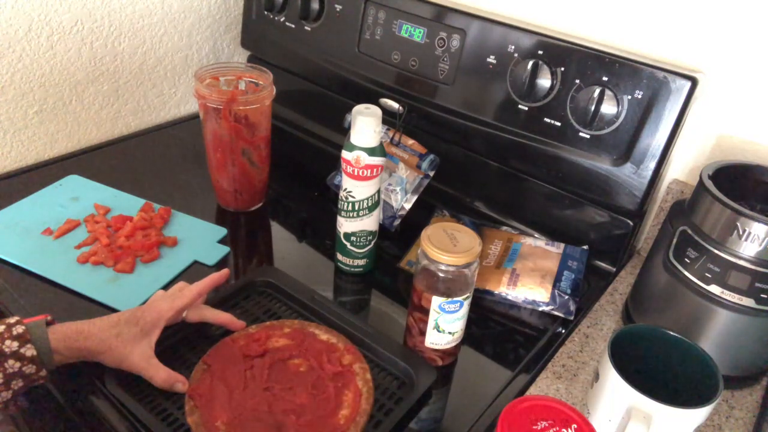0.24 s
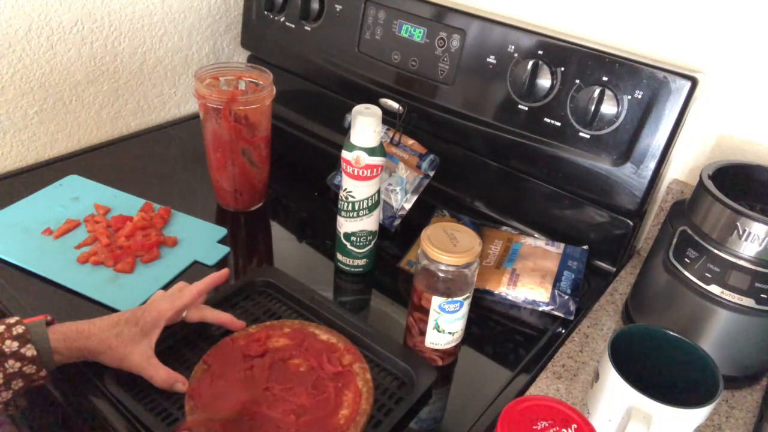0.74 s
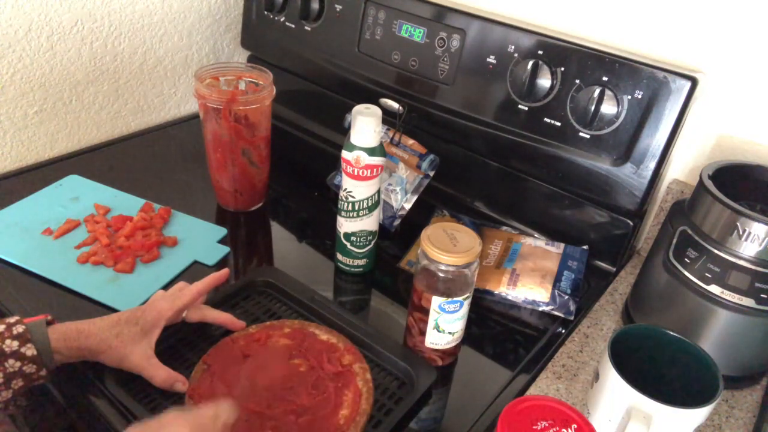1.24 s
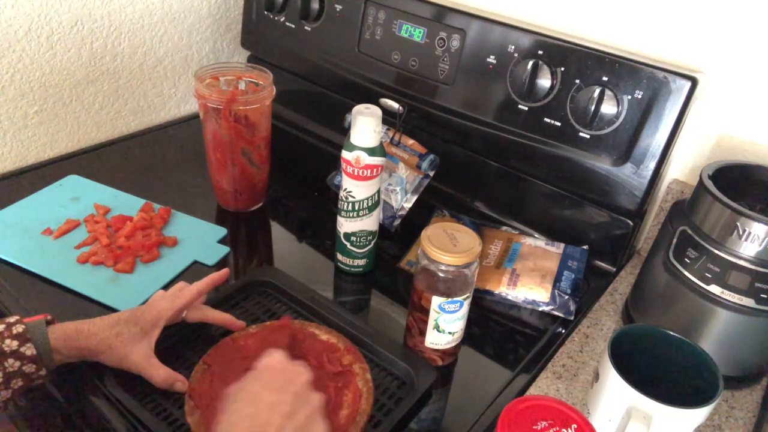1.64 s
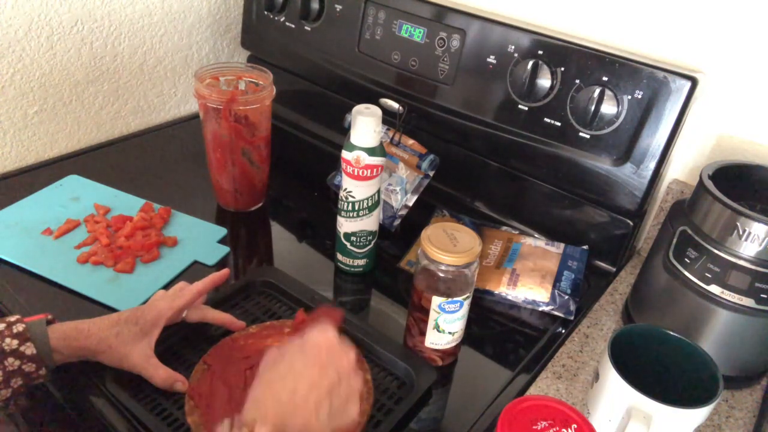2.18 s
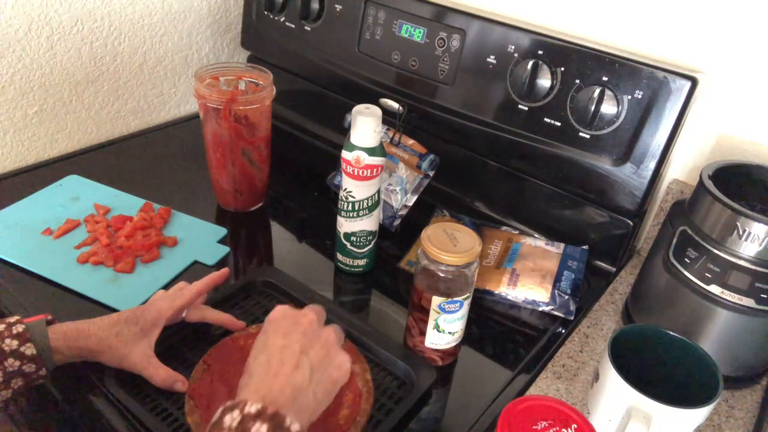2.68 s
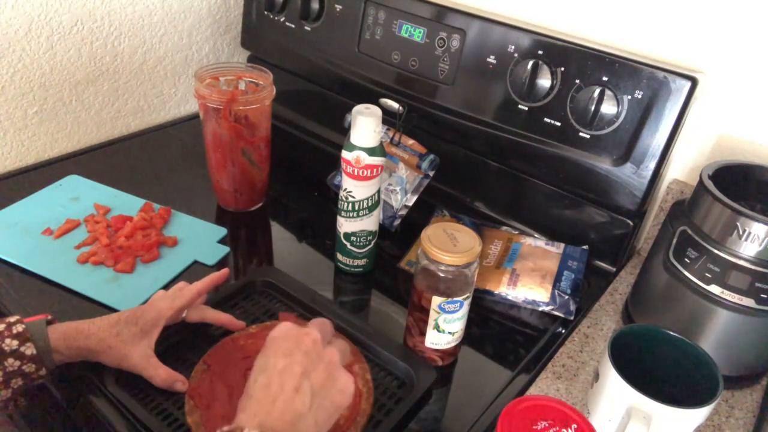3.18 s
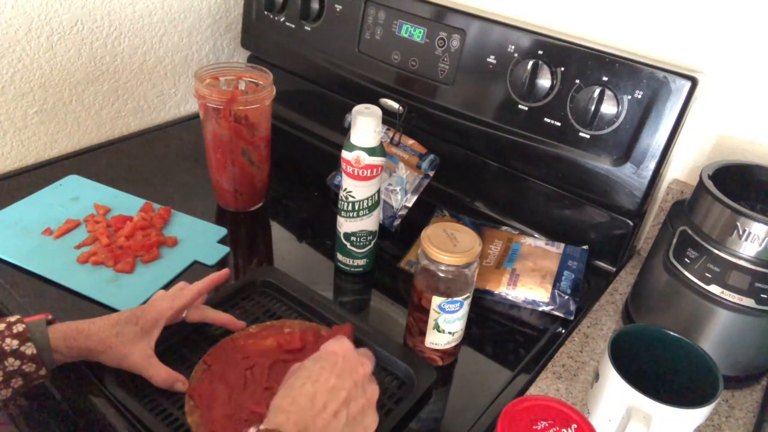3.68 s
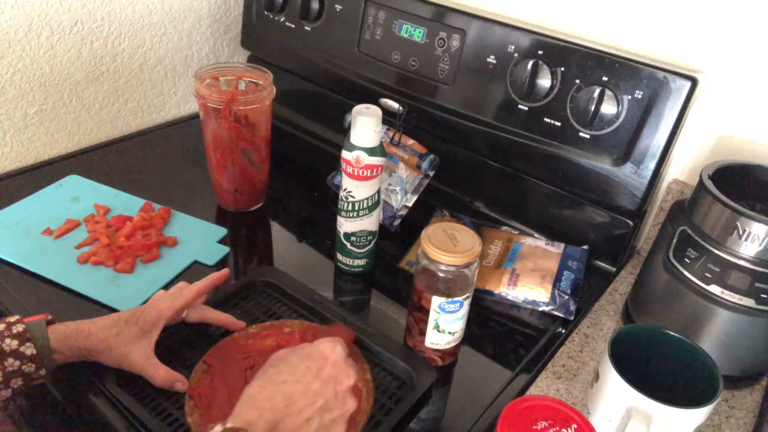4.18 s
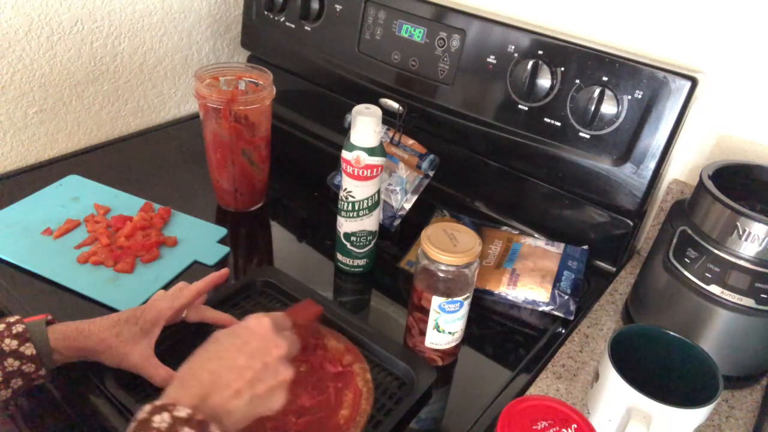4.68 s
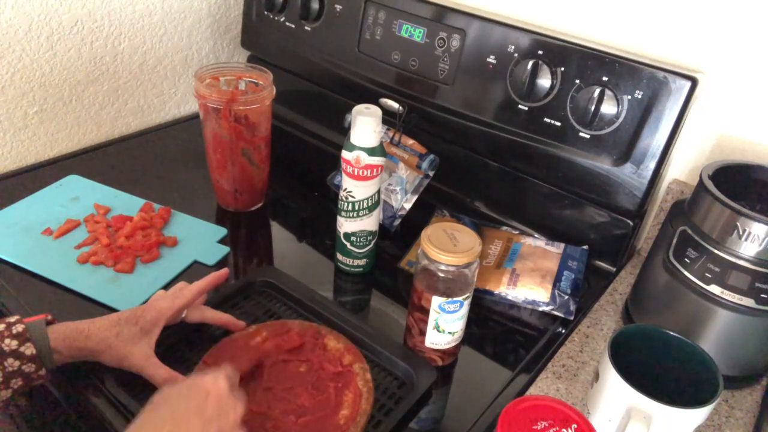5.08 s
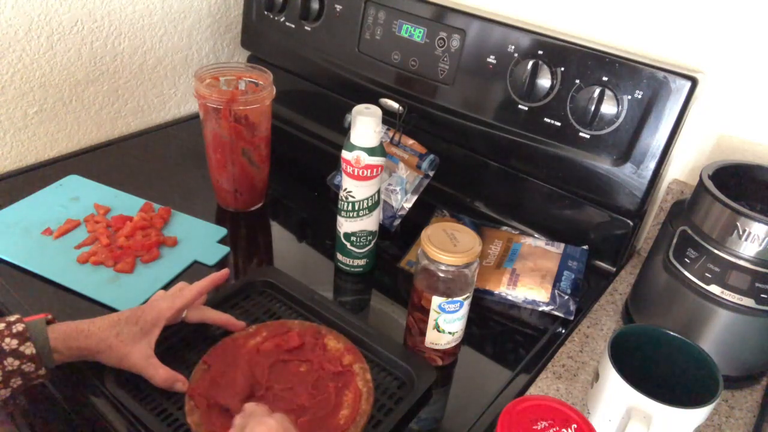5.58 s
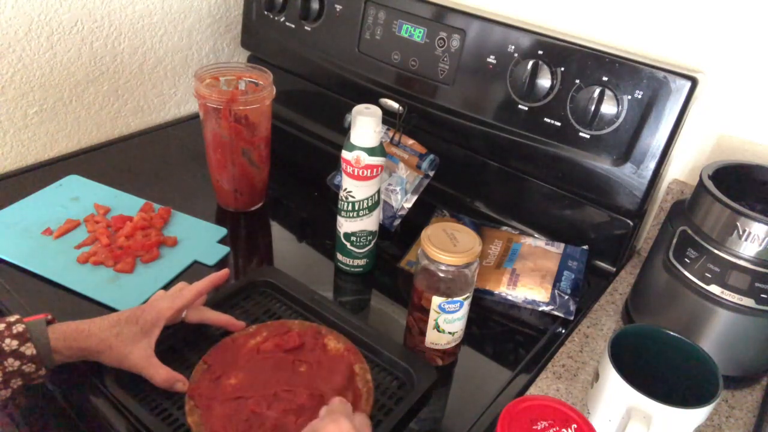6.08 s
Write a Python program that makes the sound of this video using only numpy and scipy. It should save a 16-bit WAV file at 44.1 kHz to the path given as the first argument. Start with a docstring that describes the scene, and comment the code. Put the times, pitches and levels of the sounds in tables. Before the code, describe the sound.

A utensil spreads tomato sauce on a pizza base, making quiet, scattered ticks and squelches close by. One sharp, briefly ringing click on the metal pan stands out as the loudest sound. After a small cluster of squelches come two cushioned clatters on the pan and a faint swell of crackle. A low, even hum of a fridge and fan fills the small kitchen throughout.

```python
"""Tomato sauce is spread over a pizza base on a metal pan on a stove top, in a small kitchen.
From the start, over the steady hum of a fridge compressor and a fan, the sauce film ticks as it parts
and bubbles squelch under the utensil. At 2.4 s a knock excites the pan's modes in one sharp click.
Near 4 s the squelches crowd together; at 4.2 s and 4.6 s cushioned knocks rebound in two soft clatters.
The hissy crackle swells briefly at 4.9 s, and a few last ticks and squelches follow."""
import sys
import numpy as np
from scipy import signal
from scipy.fft import rfft, irfft
from scipy.io import wavfile

SR = 44100
rng = np.random.default_rng(int(sys.argv[2]) if len(sys.argv) > 2 else 0)


def to_wav(s):
    """Save 16-bit WAV."""
    ch = np.atleast_2d(s).T  # columns
    pcm = np.round(np.clip(ch, -1, 1) * 32767)  # PCM
    wavfile.write(sys.argv[1], SR, pcm.astype(np.int16))


N = 279153
T = np.arange(N) / SR


# the sauce film parting: start_s, relative_level_db, centre_hz, width_octaves
FILM_TICKS = [(.213, -62.5, 13000, .7), (.337, -58, 6860, 0.41), (.573, -62, 8500, 1.1),
              (1.121, -65, 13000, .6), (1.887, -58.5, 14000, .8), (3.130, -61, 13650, 0.8),
              (4.186, -55.5, 9000, .6), (4.431, -57, 9600, 0.35), (4.548, -47, 12000, 1),
              (5.013, -60, 13500, .6), (5.049, -53, 13000, .7), (5.254, -64.5, 11000, 1.5)]
# sauce squeezed under the utensil: start_s, level_db, centre_hz, width_octaves, length_s
SQUEEZES = [(1.188, -58.5, 3500, 0.9, 0.011), (1.875, -60.5, 3550, 0.89, .009),
            (3.923, -59, 1250, 0.4, 0.015), (3.956, -57, 2210, 1.1, .0031), (4.005, -59, 1300, 1.3, 0.024),
            (4.03, -51, 1320, .87, 0.012), (4.543, -60, 1970, 3.1, 0.0094), (4.918, -66, 990, 1.7, 0.026),
            (5.549, -62, 3730, 1.2, .012)]

def sauce(tick_gain_db=-1, slide_db=-81, slide_band_hz=(3500, 7500), grains_per_s=2500, swell_db=8.5):
    """Rupture and friction: ticks, duller squelches and a hissy crackle that wavers and swells once."""
    out = np.zeros(N)
    for start_s, db, hz, octaves, length_s in SQUEEZES:
        add(out, start_s, from_db(db) * squelch(hz, octaves, length_s))
    grains = (rng.random(N) < grains_per_s / SR) * rng.standard_normal(N)
    grains *= from_db(2.5 * drift(40))  # the crackle comes in clumps
    contour_db = 0.9 * drift(4) + swell_db * bump(4.9, width_s=0.069)
    for start_s, db, hz, octaves in FILM_TICKS + faint_ticks():
        add(out, start_s, from_db(db + tick_gain_db) * film_tick(hz, octaves))
    crackle = rms_one(cut(grains, slide_band_hz, "band"))
    return out + from_db(slide_db + contour_db) * crackle


def squelch(hz, octaves, length_s, ring_cycles=10, rise=0.38, count=24, size=4000):
    """Bubble resonance: each of a cluster of tiny bubbles rings, rising in pitch as it dies."""
    place, pitch, strength = rng.random((3, count, 1))
    birth_s = length_s * (np.arange(count)[:, None] + place) / count
    age = np.maximum(T[:size] - birth_s, 0)
    bubble_hz = hz * 2 ** (octaves * (pitch - .5))
    t60 = ring_cycles / bubble_hz
    amplitude = (.5 + strength) * rng.choice([-1, 1], (count, 1))
    phase = 2 * np.pi * bubble_hz * age * (1 + rise * age / t60)
    cluster = (amplitude * np.sin(phase) * decay(age, t60)).sum(axis=0)
    return rms_one(cluster) * np.sqrt((length_s + 0.00092) * SR / size)  # rms near 1 while it lasts


def film_tick(hz, octaves, attack_s=0.00027, hold_s=0.00076, t60=0.042, size=6000):
    """Film rupture: tiny air pockets burst for a moment, and the sound scatters off the stove top."""
    t = T[:size]
    grains = rng.standard_normal(size) * from_db(1.2 * rng.standard_normal(size))
    edges_hz = hz * 2 ** (np.array([-.5, .5]) * octaves)
    band = rms_one(cut(grains, edges_hz, "band"))
    return band * (1 - np.exp(-t / attack_s)) * decay(np.maximum(t - hold_s, 0), t60)


def faint_ticks(per_s=1.2, db=-71, spread_db=2, hz=12500, spread_octaves=.5, width_octaves=.6):
    """A random point process: small ticks scattered over the whole spreading; rows like FILM_TICKS."""
    rows = []
    for when, softness, pitch in rng.random((round(per_s * N / SR), 3)):
        level_db = db - spread_db * (2 * softness - 1)
        centre_hz = hz * 2 ** (spread_octaves * (pitch - .5))
        rows.append((when * T[-1], level_db, centre_hz, width_octaves))
    return rows


# knocks on the pan: start_s, gain_db, rebound_count (rounded in use), change_per_rebound_db,
# crack_db, body_db, treble_db, main_mode_db
PAN_KNOCKS = [(2.4256, 0, 0, 0, -4, 1, -2.5, -1.5), (4.2123, -33, 0, 0, -16, 19.5, 7.5, -9),
              (4.2183, -26, 1, -2.5, -7, 17, -2, -8.5), (4.2628, -38.5, 1.5, -7.5, -18, 25, -18, -7),
              (4.5897, -34.5, 2.5, 0, -6.5, 15, 10, -8)]

def pan(body_hz=600, treble_hz=7500, lowest_hz=150):
    """Contact shapes the spectrum: cushioning trades crack for low body, scraping edges add treble."""
    clack, ring = np.zeros((2, N))
    for start_s, gain_db, rebounds, change_db, crack_db, body_db, treble_db, main_mode_db in PAN_KNOCKS:
        for s, db in chatter(start_s, gain_db, rebounds, change_db):
            blow = from_db(db) * pan_blow(crack_db, main_mode_db)
            blow += (from_db(body_db) - 1) * cut(blow, body_hz, "low", order=1)
            blow += (from_db(treble_db) - 1) * cut(blow, treble_hz, "high", order=1)
            blow = cut(blow, lowest_hz, "high")
            add(clack, s, blow[0])
            add(ring, s, blow[1])
    return clack, ring


def chatter(start_s, db, rebounds, change_db, spacing_s=.0058, jitter=.1):
    """Elastic rebound: a blow, then any quick, uneven bounces; rows of start_s, gain_db."""
    slack = jitter * rng.uniform(-1, 1, round(rebounds) + 1)
    return [(start_s + spacing_s * (k + late * (k > 0)), db + k * change_db)
            for k, late in enumerate(slack)]


# spectrum of the opening crack: frequency_hz, relative_level_db
CRACK_SPECTRUM = [(200, -55.5), (600, -27.5), (1000, -10), (1500, 2.5), (2400, 5), (3600, 8), (4400, 11),
                  (5500, 1), (7600, -24), (10000, -19.5), (15000, -17.5)]
# modes of the pan, the two main ones first: pitch_hz, relative_level_db, t60_s
RING_MODES = [(3492, -17, .06), (2435, -24, .055), (4290, -26, .07), (3220, -28, .07), (328, -45, .2),
              (440, -52, .15), (770, -44, .15), (1205, -40, .07), (1290, -40, .07), (1385, -41, .07),
              (2035, -38, .18), (2080, -32, .07), (2490, -39, .12), (2815, -42, .1), (3130, -35, .09),
              (3870, -33, .06), (4145, -28, .06), (4480, -31, .06), (5290, -38, .06), (5878, -38, .07),
              (7320, -38, .05), (7675, -40, .06), (12500, -48, .04)]

def pan_blow(crack_db, main_mode_db, echo_s=.00285, echo_db=-7, sheet_db=-20, low_modes_db=5, size=22050):
    """Impulse response of a plate, in two rows: the clack (crack, echo, rattle) and the modal ring."""
    t = T[:size]
    crack = np.zeros(size)
    add(crack, 0, from_db(crack_db) * pulse(CRACK_SPECTRUM))
    echo = from_db(echo_db) * np.interp(t - echo_s, t, crack, left=0)  # off the stove's back panel
    sheet = from_db(sheet_db) * sheet_rattle(size)
    ring = np.zeros(size)
    for k, (hz, db, t60) in enumerate(RING_MODES):
        mode_db = db + main_mode_db * (k < 2) + low_modes_db * (hz < 500)
        ring += (-1) ** k * from_db(mode_db) * np.sin(2 * np.pi * hz * t) * decay(t, t60)
    return np.array([crack + echo + sheet, ring])


# spectrum of the metal sheet's rattle: frequency_hz, relative_level_db
RATTLE_SPECTRUM = [(60, -16), (150, -15.5), (330, -7), (600, -11.5), (1000, -7.5), (1300, -5),
                   (1750, -19.5), (2300, -4.5), (4200, -10), (5500, -6), (8000, -8), (11000, -18),
                   (15500, -23.5)]

def sheet_rattle(size, nominal_t60=0.069, build_s=.002):
    """Bending waves reflect around the sheet: a dense, dying burst with a smooth spectrum."""
    t = T[:size]
    envelope = decay(t, nominal_t60) * (1 - np.exp(-t / build_s))
    phase = np.angle(rfft(rng.standard_normal(size) * envelope))
    burst = irfft(bin_gains(RATTLE_SPECTRUM, size) * np.exp(1j * phase), size)
    burst *= decay(t, 10 * nominal_t60) * (t < t[-1] / 2)  # keeps the tail quiet
    return burst * np.linalg.norm(envelope) / np.linalg.norm(burst)


def kitchen(x, wet_db=-10.0, t60=0.47, treble_t60=0.33, split_hz=7000, build_s=0.0027, size=26000):
    """Reverberation: a diffuse tail builds up quickly and dies sooner in the treble."""
    t = T[:size]
    scatter = rng.standard_normal(size)
    low = cut(scatter, split_hz, "low", order=3) * decay(t, t60)
    high = cut(scatter, split_hz, "high", order=3) * decay(t, treble_t60)
    tail = (low + high) * (1 - np.exp(-(t / build_s) ** 2))
    return from_db(wet_db) * signal.fftconvolve(x, tail / np.linalg.norm(tail))[:N]


# strong harmonics of the compressor: harmonic_number -> rms_level_db
WHINE_HARMONICS = {19: -87, 25: -72, 26: -76, 30: -83, 33: -76, 34: -86, 35: -87, 42: -89, 58: -78, 77: -88,
                   89: -87, 95: -87, 97: -87, 117: -90, 154: -91, 158: -93, 174: -95, 218: -99}

def compressor(speed_hz=58.94, wobble_hz=.006, waver_db=1.7):
    """A piston pump's periodic motion gives a harmonic series: a throb, a wavering whine and a buzz."""
    turn = 2 * np.pi * np.cumsum(speed_hz + wobble_hz * drift(3.4)) / SR
    whine = sum(from_db(db + waver_db * drift(4.5)) * np.sin(k * turn + 2 * np.pi * rng.random())
                for k, db in WHINE_HARMONICS.items())
    return np.sqrt(2) * (throb(turn) + whine + buzz(turn, speed_hz))


def throb(turn, pump_db=-68, motor_db=-77, period_s=2.65, crest_s=1.5):
    """Beating: the pump's fundamental interferes with a second motor that turns a little faster."""
    slip = 2 * np.pi * (T - crest_s) / period_s
    return from_db(pump_db) * np.sin(turn) + from_db(motor_db) * np.sin(turn + slip)


# spectral envelope of the compressor's faint harmonics: frequency_hz, mean_level_db
BUZZ_SPECTRUM = [(1000, -86.5), (1700, -94.5), (2400, -102.5), (3500, -99), (4900, -99), (5500, -88.5),
                 (6200, -97.5), (6900, -96.5), (8300, -108), (9100, -91.5), (9800, -108), (10250, -100),
                 (12200, -110), (12900, -101), (13600, -114)]

def buzz(turn, speed_hz, spread_db=4.5, size=8192):
    """Fourier series: the remaining harmonics form one waveform that repeats with each turn."""
    multiples = np.arange(2, 240)
    level_db = at_hz(BUZZ_SPECTRUM, multiples * speed_hz)
    level_db += spread_db * (2 * rng.random(len(multiples)) - 1)
    lines = from_db(level_db) * np.exp(2j * np.pi * rng.random(len(multiples)))
    lines[np.isin(multiples, list(WHINE_HARMONICS))] = 0
    cycle = irfft(np.r_[0, 0, lines], size) * size / 2
    return np.interp(turn, np.arange(size) * 2 * np.pi / size, cycle, period=2 * np.pi)


# hiss of moving air: frequency_hz, relative_density_db
HISS_SPECTRUM = [(28, -14), (39, 2), (75, -2.5), (100, 0.5), (260, 6), (480, -0.5), (650, -1), (1100, -12),
                 (1700, -12), (2200, -19), (6500, -21), (8500, -26.5), (15500, -28)]
# mains hum and blade tone: pitch_hz, rms_level_db, waver_db
FAN_TONES = [(120.2, -64.5, 1.5), (194.9, -54, 1)]
# sags and swells of the rumble: centre_s, half_width_s, gain_db
SWELLS = [(1.5, .25, -3), (3.42, 0.21, 4), (5.35, 1, 2)]
# air resonances stirred by the fan: centre_hz, width_hz, relative_level_db
AIR_RESONANCES = [(179, 33, -4.5), (232.1, 20.5, 1), (399, 25, -11.5)]

def fan(hiss_db=-60.5, rumble_db=-58):
    """Tonal and broadband noise: mains hum and blade tone over a soft hiss and rumbling resonances."""
    out = from_db(hiss_db) * noise(HISS_SPECTRUM, N)
    for hz, db, waver_db in FAN_TONES:
        amplitude = np.sqrt(2) * from_db(db + waver_db * drift(6.2))
        out += amplitude * np.sin(2 * np.pi * hz * T + 0.064 * drift(6.4))
    swell = from_db(rumble_db + sum(db * bump(s, width_s) for s, width_s, db in SWELLS))
    for hz, width_hz, db in AIR_RESONANCES:
        band = cut(rng.standard_normal(N), [hz - width_hz / 2, hz + width_hz / 2], "band")
        out += swell * from_db(db) * rms_one(band)
    return out


def from_db(db):
    """Decibels to amplitude ratio."""
    return 10 ** (np.asarray(db) / 20)


def rms_one(x):
    """Normalisation to rms 1."""
    return x / np.sqrt(np.mean(x ** 2) + 1e-20)


def at_hz(points, hz):
    """Interpolation of a spectrum on a log-frequency axis."""
    f, db = np.transpose(points)
    return np.interp(np.log(hz + 0.00072), np.log(f), db)


def bin_gains(spectrum, size):
    """A spectrum's amplitude at each Fourier bin."""
    return from_db(at_hz(spectrum, np.fft.rfftfreq(size, 1 / SR)))


def add(out, s, sound):
    """Superposition of a sound from time s on."""
    i = round(s * SR)
    out[i:i + len(sound)] += sound[:N - i]


def cut(x, hz, kind, order=2):
    """Butterworth filter."""
    return signal.sosfilt(signal.butter(order, np.clip(hz, 10, .47 * SR), kind, fs=SR, output="sos"), x)


def noise(spectrum, size):
    """Spectrally shaped noise; rms 1."""
    return rms_one(irfft(rfft(rng.standard_normal(size)) * bin_gains(spectrum, size), size))


def pulse(spectrum, size=2048):
    """Minimum phase: the most compact causal pulse of a given spectrum; height 1."""
    cepstrum = irfft(np.log(bin_gains(spectrum, size)))
    one_sample_delay = np.exp(-2j * np.pi * np.fft.rfftfreq(size))
    shape = irfft(np.exp(rfft(2 * cepstrum[1:size // 2], size) * one_sample_delay))
    return shape / np.abs(shape).max()


def drift(knots_per_s):
    """Slow random modulation with a spread near 1."""
    knots = rng.standard_normal(1000)
    return np.interp(T * knots_per_s, np.arange(len(knots)), knots)


def decay(t, t60):
    """Exponential damping: 60 dB in t60 seconds."""
    return np.exp(-np.log(1000) * t / t60)


def bump(s, width_s):
    """A Gaussian rise and fall around time s; height 1."""
    return np.exp(-((T - s) / width_s) ** 2)


def scene(ring_to_room_db=-9):
    """Directivity: the clack spreads through the room; the flat sheet beams its ring mostly upwards."""
    clack, ring = pan()
    near = clack + sauce()
    room = kitchen(near + from_db(ring_to_room_db) * ring)
    return (near + ring + room + compressor() + fan())[None]


def record(dry, cutoff_hz=15900):
    """Band limiting: an elliptic low-pass cuts the top steeply."""
    return signal.sosfilt(signal.ellip(10, .1, 70, cutoff_hz, fs=SR, output="sos"), dry)


dry = scene()
out = record(dry)
to_wav(out)
```